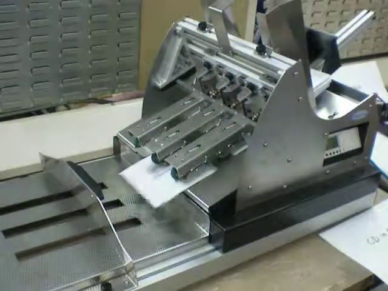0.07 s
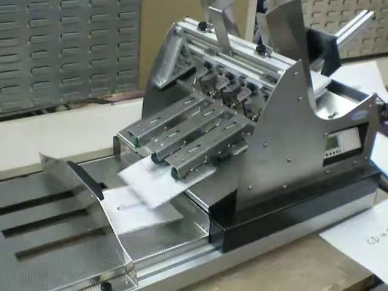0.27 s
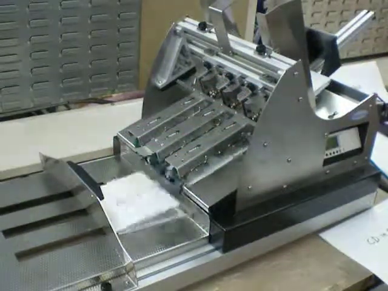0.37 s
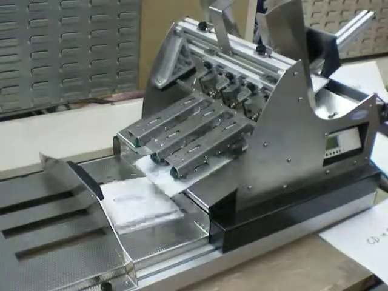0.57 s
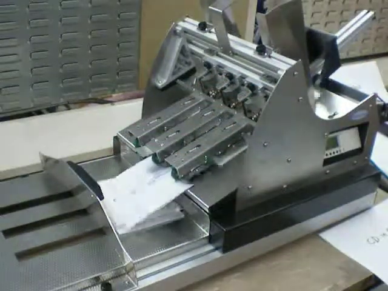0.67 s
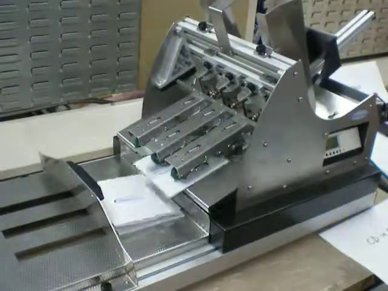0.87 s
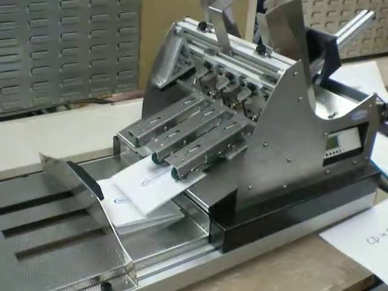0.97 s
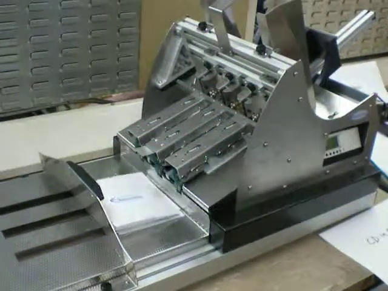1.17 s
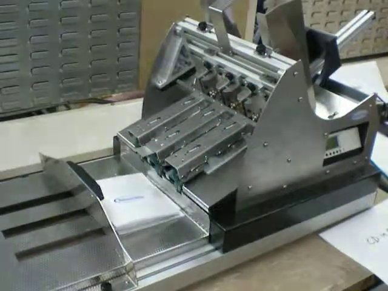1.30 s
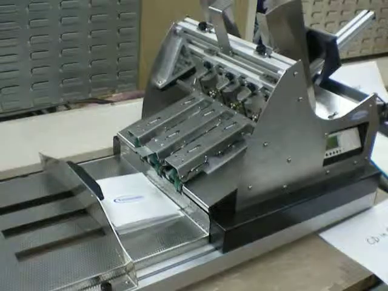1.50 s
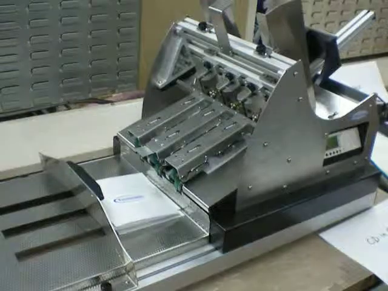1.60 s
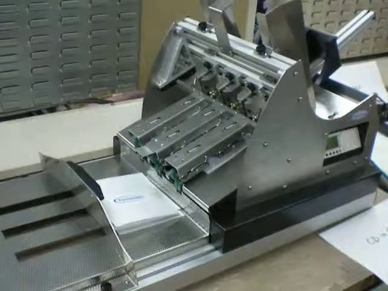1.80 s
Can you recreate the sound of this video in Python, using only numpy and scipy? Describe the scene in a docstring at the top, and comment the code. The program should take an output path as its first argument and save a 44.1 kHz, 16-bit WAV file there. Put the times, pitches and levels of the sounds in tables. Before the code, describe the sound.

In a workshop, a feeder machine runs one cycle, its rollers whirring and metal arms clacking loudly, with a dull tone. The clatter thins as a card drops onto the tray, leaving a low fan hum and soft hiss.

```python
"""In a workshop, a steel friction feeder runs one cycle and pushes a flat card cover onto its tray.
The drive whirs up and runs down over a motor whine, a quiet fan and mains hum and a low rumble.
Rollers tick and hold-down arms clack: chattering steel contacts that ring the sheet-metal frame
and thump the bench and tray. The cover slides and flops down, and a soft hiss comes in at the end.
The top end is dull, with little above 4 kHz, and the hardest clacks overload."""
import sys
import numpy as np
from scipy import signal
from scipy.fft import rfft, irfft, next_fast_len
from scipy.io import wavfile
from scipy.ndimage import uniform_filter1d

SR = 44100
rng = np.random.default_rng(int(sys.argv[2]) if len(sys.argv) > 2 else 0)


def generate_wav(sig):
    """Save sig (samples, or channels by samples) to the path in sys.argv[1] as 16-bit PCM at SR."""
    pcm = np.round(np.clip(np.atleast_2d(sig).T, -1, 1) * 32767).astype(np.int16)
    wavfile.write(sys.argv[1], SR, pcm)


N = 81585
T = np.arange(N) / SR
BLOW_T = T[:SR // 3]

# fan and mains hum: (frequency [Hz], level [dB])
HUM_TONES = [(100, -47), (175, -52), (202, -47.5), (298, -57.5), (497, -55)]
# fader ride of the motor whine: (time [s], level [dB])
WHINE_FADER = [(0, -55.5), (.24, -34), (.5, -76), (1.85, -55.5)]
# room tone: (frequency [Hz], gain [dB])
AIR_EQ = [(20, 0), (60, 2.5), (120, -6.5), (200, 1.5), (330, -9), (600, -14.5), (1100, -16.5),
          (2000, -25.5), (3500, -22), (4200, -25)]
# swells of the low rumble: (time [s], level [dB])
RUMBLE_FADER = [(0, -37.5), (.15, -65), (.21, -42), (.28, -20), (.35, -35.5), (.78, -42.5), (.85, -31),
                (1.0, -30), (1.2, -44.5), (1.42, -56.5), (1.48, -27), (1.59, -28.5), (1.67, -41.5)]
# weight of the low rumble: (frequency [Hz], gain [dB])
RUMBLE_EQ = [(12, 8), (28, 11.5), (55, -5), (95, -0.5), (170, -14), (400, -17), (1500, -92)]
# how hard the drive works: (time [s], level [dB])
DRIVE_EFFORT = [(0, -38.5), (.075, -37.5), (.13, -29), (.19, -29), (.25, -23), (.38, -23), (.47, -22),
                (.6, -24), (.72, -28.5), (.82, -26.5), (.95, -31.5), (1.05, -34.5), (1.19, -35.5),
                (1.3, -29.5), (1.41, -65)]
# whir of belts and rollers: (frequency [Hz], gain [dB])
ROLLING_EQ = [(40, -9.5), (110, -8), (185, 2.5), (310, -8.5), (480, -4), (700, -2), (850, -11.5),
              (1100, -8.5), (1400, -15), (2200, -24), (4000, -19.5)]
# ring of the steel arms: (frequency [Hz], level [dB], T60 [s])
ARM_MODES = [(2068, 1, 0.013), (2270, -2.5, 0.0083), (2806, -4.5, 0.079), (3240, -14.5, 0.014),
             (3714, 4, 0.01)]
# ring of the sheet-metal frame: (frequency [Hz], level [dB], T60 [s])
FRAME_MODES = [(162, -7, 0.25), (195.7, -8.5, 1), (256, -7, .18), (489.7, 0, 0.14), (569.5, -1.5, 0.074),
               (612.2, -5, 0.082), (678, -14.5, 1), (805, -10, .36), (904, -10.5, 0.087), (1074, -8, .07),
               (1369, -15.5, 0.027), (1511, -5.5, 0.085)]
# sharp ticks of rollers, arms and the cover's edge: (time [s], level [dB], decay [s])
TICK_CUES = [(0.158, -27.5, 0.032), (0.2383, -27.5, 0.0043), (0.2938, -16.5, 0.00096),
             (0.3316, -10, 0.00086), (0.3991, -17, 0.0044), (0.4626, -14, 0.0046), (0.5559, -18.5, 0.0028),
             (0.61, -13.5, 0.0029), (0.7355, -23, 0.0022), (0.7821, -27.5, 0.01), (.889, -31.5, .002),
             (.938, -32.5, .0034), (0.974, -35, .004), (1.1165, -32, 0.0035), (1.238, -25, 0.016)]
# bite of ticks and rattles: (frequency [Hz], gain [dB])
TICK_EQ = [(200, -31), (700, -11.5), (1200, 5), (1800, 7), (2400, 14), (3200, 18.5), (4200, 10.5)]
# heavy clacks: (time [s], clash level [dB], frame level [dB], attack [s], decay [s], frame focus [Hz])
CLACK_CUES = [(0.293, -13.5, -12, 0.00034, 0.017, 1060), (.3255, -6, -16.5, 0.001, 0.0032, 1120),
              (.370, -19, -18, 0.00083, 0.0079, 625), (0.4876, -8, -12, 0.0054, 0.0053, 728),
              (.526, -18, -20, 0.0066, 0.016, 628), (.588, -26.5, -22, 0.0034, 0.01, 640),
              (.6495, -18.5, -11.5, .003, 0.016, 551), (.694, -20, -20, 0.012, 0.004, 308),
              (.747, -32.5, -24.5, 0.0016, .0067, 584), (.807, -27.5, -24.5, 0.00082, 0.0067, 980),
              (0.8676, -13, -13.5, 0.0052, 0.0026, 520), (1.1145, -35, -28, 0.0011, .008, 250),
              (1.1395, -27, -32, .004, 0.0064, 1090), (1.2443, -15.5, -15, 0.0067, 0.0063, 882)]
# steel clashing on steel: (frequency [Hz], gain [dB])
CLASH_EQ = [(200, -24.5), (600, -2.5), (1100, 7), (1700, -0.5), (2200, -2), (2800, 3), (3400, 5.5),
            (4200, -7)]
# boxy body of the frame's panels: (frequency [Hz], gain [dB])
PANEL_EQ = [(60, -8), (180, 4.5), (330, -14.5), (520, -0.5), (630, 3.5), (780, -13.5), (1100, -5),
            (1700, -18.5), (4000, -16)]
# thumps of the bench and the hollow tray: (time [s], level [dB], pitch [Hz])
THUMP_CUES = [(0.339, -17, 86.7), (0.503, -16, 87.5), (.682, -16.5, 484.5), (0.877, -21, 93.6),
              (0.887, -23.5, 493.5), (1.099, -27, 244.5), (1.255, -23.5, 136)]
# the cover's slide and landing: (time [s], level [dB])
SLIDE_FADER = [(.9, -60.5), (1.0, -53), (1.09, -52), (1.125, -25), (1.155, -30.5), (1.19, -64),
               (1.4, -81.5)]
# card rubbing on the tray: (frequency [Hz], gain [dB])
SLIDE_EQ = [(90, -6.5), (240, 11.5), (420, -3.5), (800, -23), (1100, 1), (1700, -42), (4000, -15.5)]
# fade-in of the late hiss: (time [s], level [dB])
HISS_FADER = [(1.69, -83), (1.718, -37), (1.78, -47.5), (1.85, -45)]
# tone of the late hiss: (frequency [Hz], gain [dB])
HISS_EQ = [(200, -5), (1000, 5), (1600, 1.5), (2500, 0), (3400, -2.5), (4200, -3)]
# workshop reverb: (frequency [Hz], T60 [s])
REVERB_TIMES = [(150, 0.99), (1000, 0.22), (3000, 0.096)]


def from_db(db):
    """Decibels to gain."""
    return 10 ** (np.asarray(db) / 20)


def rms_one(x):
    """Scale to rms 1."""
    return x / np.sqrt(np.mean(x ** 2) + 1e-20)


def unit_blow(x):
    """Scale to the energy of 10 ms at rms 1."""
    return x / np.sqrt(np.sum(x ** 2) / (SR / 100) + 1e-20)


def fader(curve):
    """Gain over time from rows of (time [s], level [dB])."""
    return from_db(np.interp(T, *np.transpose(curve)))


def at_hz(table, hz):
    """Read a table on a log-frequency axis."""
    freqs, values = np.transpose(table)
    return np.interp(np.log(hz + 1e-3), np.log(freqs), values)


def equalise(x, eq):
    """Minimum-phase EQ: nothing rings ahead of an attack."""
    size = next_fast_len(len(x) + SR // 10) * 2
    gains = from_db(at_hz(eq, np.arange(size // 2 + 1) * SR / size))
    cepstrum = irfft(np.log(gains))
    cepstrum[1:size // 2] *= 2
    cepstrum[size // 2 + 1:] = 0
    return irfft(rfft(x, size) * np.exp(rfft(cepstrum)))[:len(x)]


def noise(eq):
    """Steady coloured noise, rms 1."""
    return rms_one(equalise(rng.standard_normal(N + SR // 10), eq)[-N:])


def drift(per_s):
    """Random modulation, roughly unit depth."""
    return np.interp(T * per_s, np.arange(400), rng.standard_normal(400))


def tone(hz, waver, flutter_db=2):
    """A sine that wavers in pitch and flutters in level, rms 1."""
    flutter = from_db(flutter_db * drift(25))
    pitch = hz * (1 + waver * drift(60))
    return rms_one(np.sin(2 * np.pi * np.cumsum(pitch) / SR) * flutter)


def ring(force, modes, scatter_db=2):
    """Resonances excited by a force, each at a slightly random level."""
    out = 0
    for hz, db, t60 in modes:
        radius, angle = from_db(-60 / (t60 * SR)), 2 * np.pi * hz / SR
        mode = signal.lfilter([1, 0, -1], [1, -2 * radius * np.cos(angle), radius ** 2], force + 1e-18)
        out = out + from_db(db + scatter_db * rng.standard_normal()) * rms_one(mode)
    return out


def envelope(attack_s, decay_s):
    """Linear attack, exponential decay."""
    return np.minimum(BLOW_T / attack_s, 1) * np.exp(-np.maximum(BLOW_T - attack_s, 0) / decay_s)


def add(track, start_s, sound):
    """Drop a sound onto a track at its cue."""
    i = int(start_s * SR)
    track[i:i + len(sound)] += sound[:N - i]


def hum():
    """Fan and mains hold a bed of low, slightly wavering tones."""
    return sum(from_db(db) * tone(hz, waver=.02) for hz, db in HUM_TONES)


def motor_whine():
    """The motor sings on one unsteady note that swells, drops away and creeps back."""
    return fader(WHINE_FADER) * tone(hz=917, waver=.024)


def rumble():
    """Deep noise, levelled over 50 ms so that it rolls evenly under its fader."""
    lows = noise(RUMBLE_EQ)
    power = uniform_filter1d(lows ** 2, int(.05 * SR))
    return fader(RUMBLE_FADER) * lows / np.sqrt(power)


def steel(force, eq):
    """Small steel parts clash brightly, with the short ring of the arms underneath."""
    return unit_blow(equalise(force, eq)) + from_db(-8.5) * unit_blow(ring(force, ARM_MODES))


def drive(peak_rattles_per_s=2200, spread_db=3.5):
    """Belts and rollers whir; loose parts rattle and shake the frame, more often as effort grows."""
    effort = fader(DRIVE_EFFORT)
    sizes = from_db(spread_db * np.minimum(rng.exponential(1, N), 4)) * rng.choice([-1, 1], N)
    clicks = sizes * (rng.random(N) < peak_rattles_per_s * effort / effort.max() / SR)
    rattle = from_db(-13.5) * rms_one(steel(clicks, TICK_EQ))
    whir = from_db(1.5) * noise(ROLLING_EQ)
    frame_ring = from_db(-12.5) * rms_one(ring(clicks, FRAME_MODES))
    return effort * (whir + frame_ring + rattle)


def contact(attack_s, decay_s, grit=.18):
    """Force of a chattering contact: a grainy burst that builds up and dies away."""
    grains = np.repeat(rng.standard_normal(len(BLOW_T)), 20)[:len(BLOW_T)]
    return envelope(attack_s, decay_s) * np.exp(grit * grains) * rng.standard_normal(len(BLOW_T))


def ticks(attack_s=.0007):
    """Rollers, arms and the cover's edge make light, sharp contacts."""
    track = np.zeros(N)
    for start_s, db, decay_s in TICK_CUES:
        add(track, start_s, from_db(db) * steel(contact(attack_s, decay_s), TICK_EQ))
    return track


def frame(attack_s, decay_s, focus_hz, db_per_octave=6.5):
    """Sheet metal shudders under a clack, loudest around the pitch of the struck part."""
    def rolloff_db(hz):
        return db_per_octave * abs(np.log2(hz / focus_hz))

    shudder = attack_s + .0025, decay_s + .0096  # slower to build and to fade than the clash
    modes = [(hz, db - rolloff_db(hz), t60) for hz, db, t60 in FRAME_MODES]
    panel_eq = [(hz, db - rolloff_db(hz)) for hz, db in PANEL_EQ]
    ringing = unit_blow(ring(contact(*shudder), modes))
    panels = unit_blow(equalise(contact(*shudder), panel_eq))
    return ringing + from_db(.5) * panels


def clacks():
    """Hold-down arms strike, on two stems: the bright steel clash and the body of the frame."""
    clash, body = np.zeros(N), np.zeros(N)
    for start_s, clash_db, frame_db, attack_s, decay_s, focus_hz in CLACK_CUES:
        add(clash, start_s, from_db(clash_db) * steel(contact(attack_s, decay_s), CLASH_EQ))
        add(body, start_s, from_db(frame_db) * frame(attack_s, decay_s, focus_hz))
    return clash, body


def thumps():
    """The bench top or the hollow tray swings briefly on one note after a blow."""
    track = np.zeros(N)
    shape = envelope(attack_s=.02, decay_s=.022)
    for start_s, db, hz in THUMP_CUES:
        add(track, start_s, from_db(db) * unit_blow(shape * np.sin(2 * np.pi * hz * BLOW_T)))
    return track


def cover_slide():
    """Card rubs along the tray and flops down."""
    return fader(SLIDE_FADER) * noise(SLIDE_EQ)


def hiss():
    """A soft hiss puffs up near the end and settles."""
    return fader(HISS_FADER) * noise(HISS_EQ)


def reverb(send, build_s=.0092):
    """Diffuse reflections of the workshop in octave bands; the treble dies first."""
    tail, edges = 0, 80 * 2. ** np.arange(7)
    t = T[:SR // 2]
    for low, high in zip(edges, edges[1:]):
        bandpass = signal.butter(2, [low, high], "band", fs=SR, output="sos")
        t60 = at_hz(REVERB_TIMES, np.sqrt(low * high))
        band = signal.sosfilt(bandpass, rng.standard_normal(len(t)))
        band *= np.minimum(t / build_s, 1) ** 2 * from_db(-60 * t / t60)
        tail = tail + band * np.sqrt((high - low) / (SR / 2) / np.sum(band ** 2))
    return signal.fftconvolve(send, tail)[:N]


def scene():
    """Mono mix: clacks, ticks and drive feed the reverb; the other layers stay dry."""
    clash, frame_body = clacks()
    bright = clash + ticks()
    body = frame_body + drive()
    wet = reverb(from_db(-9.5) * bright + from_db(-8) * body)
    feeder = bright + body + wet + thumps() + cover_slide()
    bed = hum() + motor_whine() + from_db(-38.5) * noise(AIR_EQ) + rumble() + hiss()
    return (feeder + bed)[None]


def record(dry, soft_ceiling=1.1, clip_level=.74):
    """Master chain: dull the top, round the peaks, cut the treble steeply, clip, trim the fizz."""
    treble_rolloff = signal.butter(8, 3652, fs=SR, output="sos")
    band_edge = signal.ellip(10, .5, 90, 4280, fs=SR, output="sos")
    fizz_cut = signal.cheby2(12, 70, 17220, fs=SR, output="sos")
    dull = signal.sosfilt(treble_rolloff, dry)
    rounded = soft_ceiling * np.tanh(dull / soft_ceiling)
    narrow = signal.sosfilt(band_edge, rounded)
    return signal.sosfilt(fizz_cut, np.clip(narrow, -clip_level, clip_level))


dry = scene()
out = record(dry)
generate_wav(out)
```